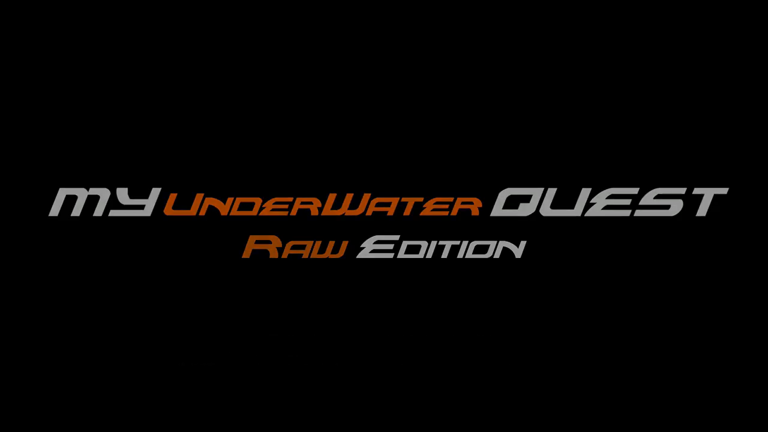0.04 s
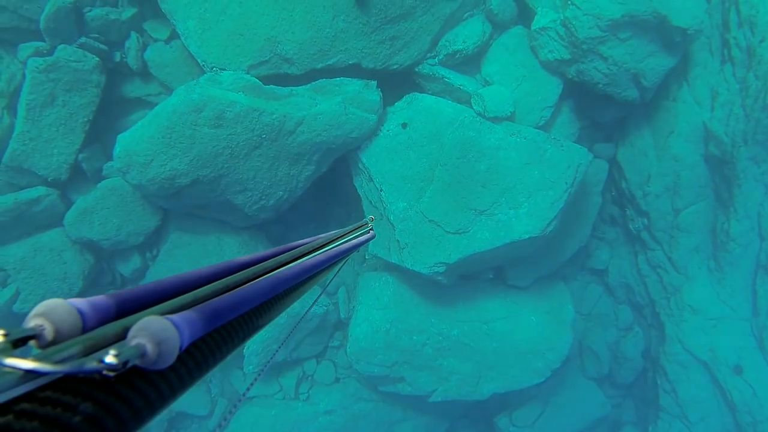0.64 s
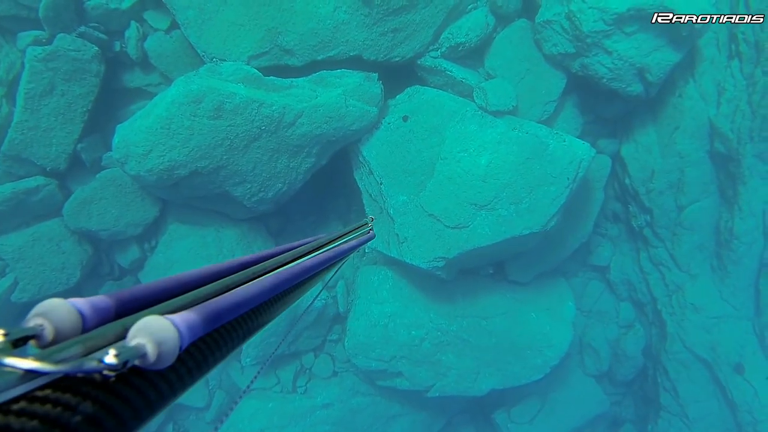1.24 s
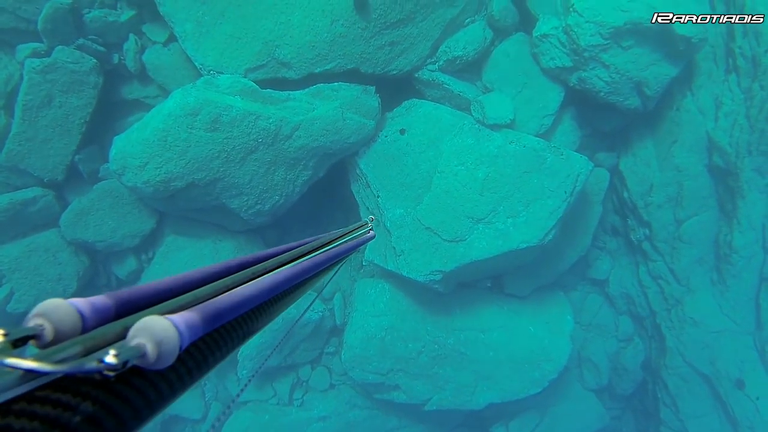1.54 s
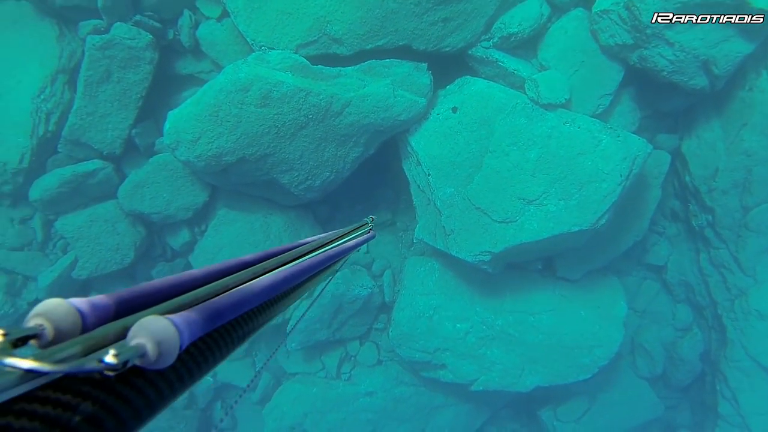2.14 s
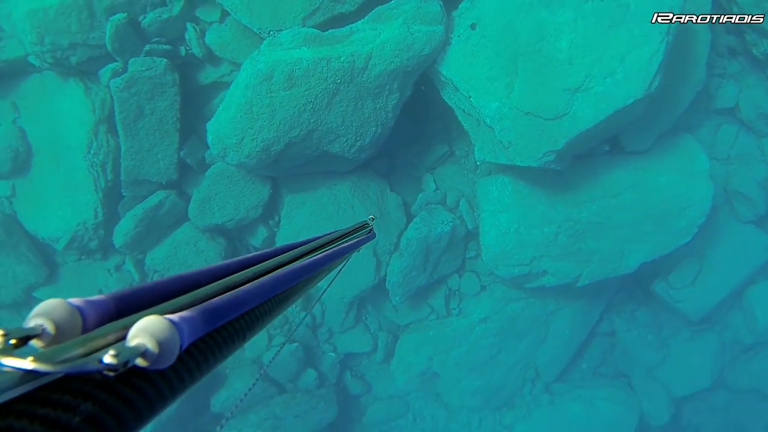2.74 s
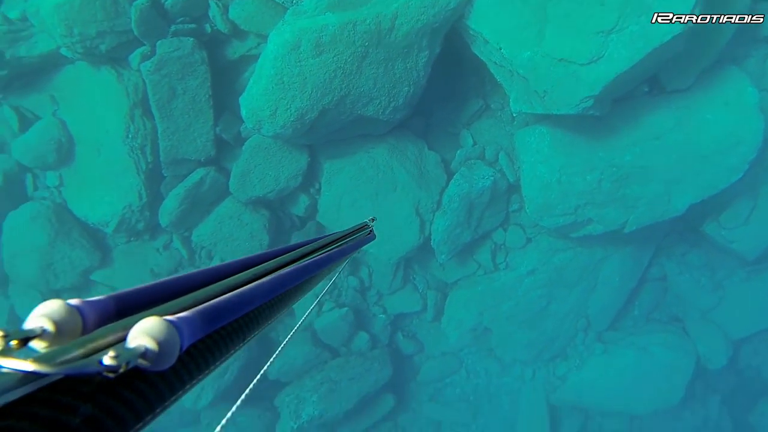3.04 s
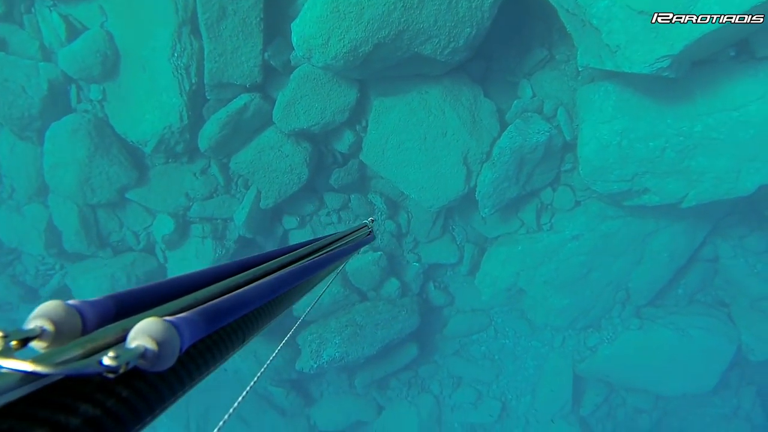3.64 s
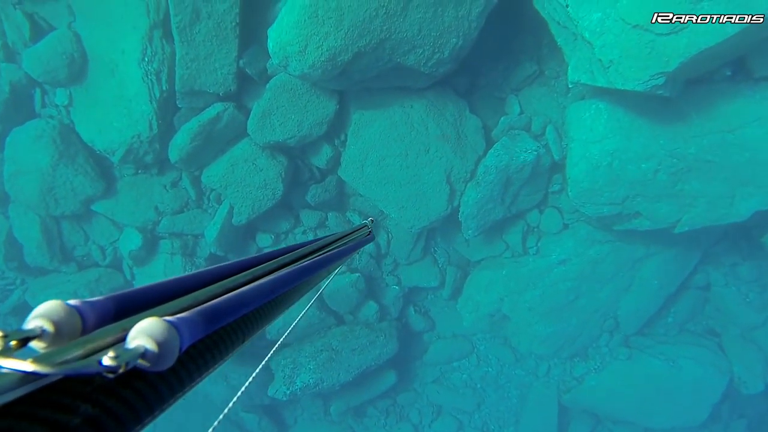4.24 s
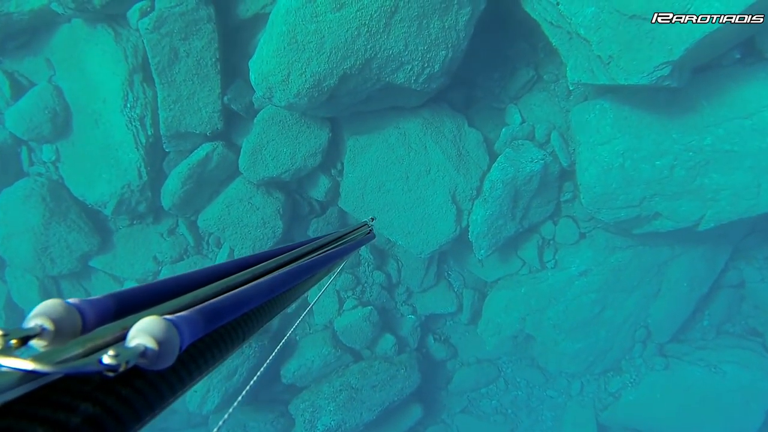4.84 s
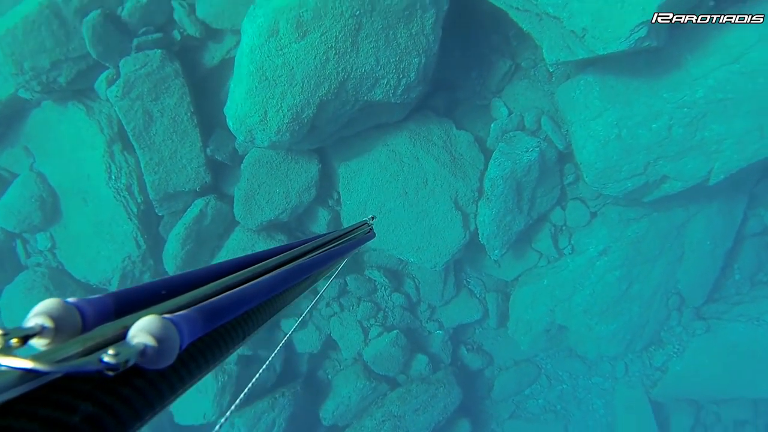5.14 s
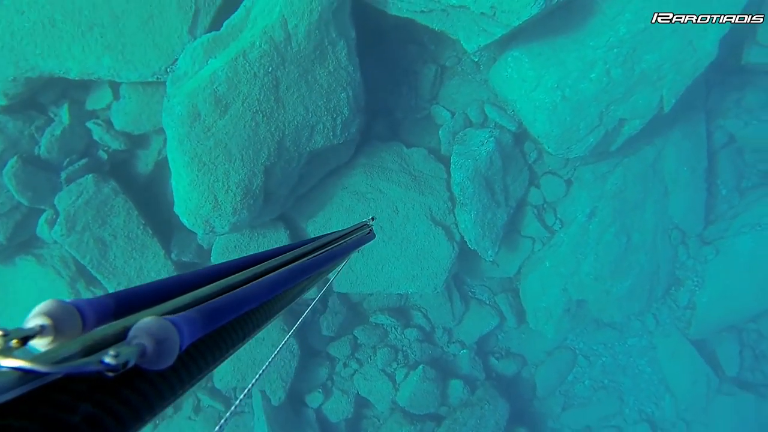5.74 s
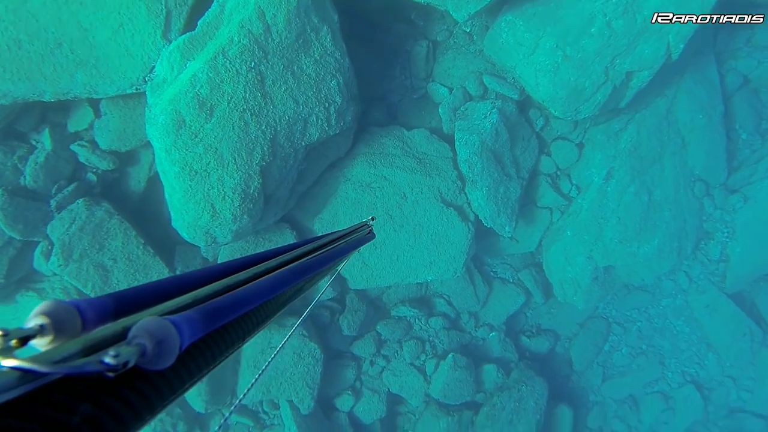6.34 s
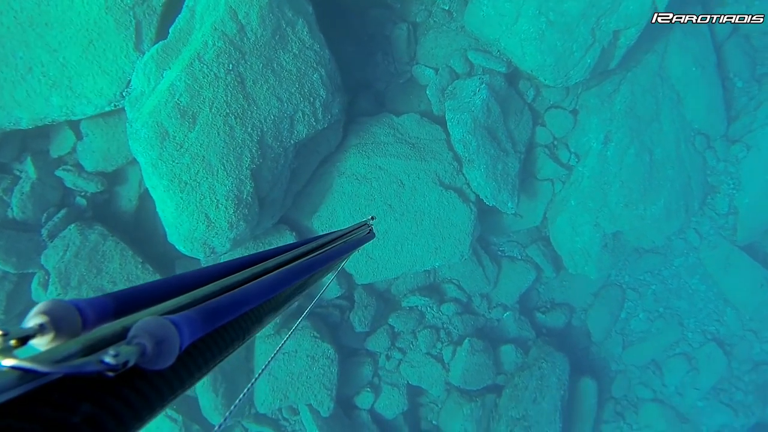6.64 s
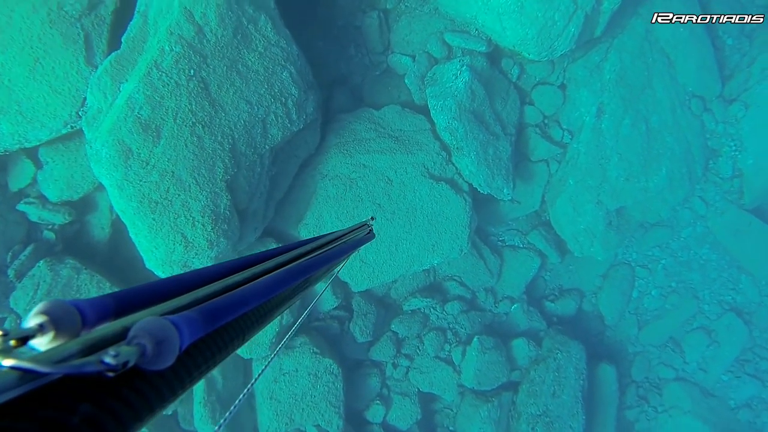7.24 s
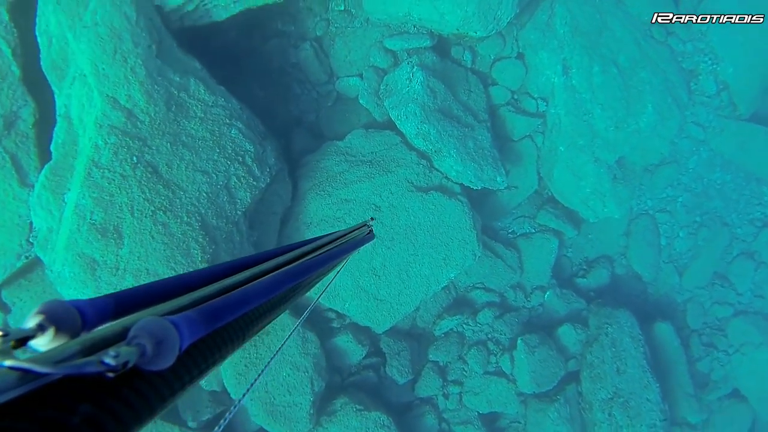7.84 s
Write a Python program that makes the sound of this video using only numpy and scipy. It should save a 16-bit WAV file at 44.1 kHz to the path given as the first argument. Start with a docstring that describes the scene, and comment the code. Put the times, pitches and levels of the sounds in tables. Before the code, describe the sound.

A deep, slowly beating underwater rumble runs for the whole eight seconds, heard from inside a sealed camera housing, with muffled surges of water churning, gurgling and fizzing over it. Shrimp snap irregularly throughout above a faint hiss, sharpest near 3.6, 5.8 and 6.5 seconds. A soft thump and gulp come at about 0.6 seconds, and more gulps at 1.3. From 1.1 to 2.6 seconds a rapid train of ringing ticks, broken at first and then even, sounds with a low gliding hum, like air squeezing through a gap. Air pockets gulp most strongly at 3 seconds and again at 4, as the wash swells. The ticking and hum return from 4.3 to 5 seconds, slowing slightly, with a low thump. Small high blips follow around 5.3 and 5.8 seconds, light scuffs on the housing near 6, and the water keeps washing to the end.

```python
"""Moving water rumbles and washes round a sealed camera housing, gliding on a speargun over a rocky seabed.
The one microphone sits inside: the rocking housing throbs, surges churn and fizz, and close by
pockets of air gulp, blip and thump. Twice a rapid train of ticks with a low hum sets in, like air
squeezing through a narrow gap. Shrimp snap among the near rocks; far off they merge into a hiss."""
import sys
import numpy as np
from scipy import signal
from scipy.fft import rfft, irfft
from scipy.io import wavfile
from scipy.ndimage import uniform_filter1d

SR = 44100
rng = np.random.default_rng(int(sys.argv[2]) if len(sys.argv) > 2 else 0)


def inscribe(sig):
    """Save sig as 16-bit PCM at rate SR to the path in sys.argv[1].

    A 1-D sig is mono; a 2-D sig holds one channel per row.
    Samples are clipped to [-1, 1] before scaling.
    """
    pcm = np.round(np.clip(np.atleast_2d(sig).T, -1, 1) * 32767)
    wavfile.write(sys.argv[1], SR, pcm.astype(np.int16))


N = 347508
TIME = np.arange(N) / SR
FREQS = np.fft.rfftfreq(N, 1 / SR)

# spectrum of water washing round the housing: f/Hz, level/dB
WASH_SPECTRUM = [(120, 0.5), (240, -6.5), (310, 1), (410, 3.5), (490, -3.5), (620, 7), (690, -0.5),
                 (800, -12), (920, -21), (1200, -23), (2000, -77), (8000, -110)]
# the housing's upper resonances, rung by fizz and scuffs: f/Hz, level/dB
FIZZ_SPECTRUM = [(600, 3.5), (1000, -1), (1250, -3.5), (1550, 4), (2000, -10), (2480, 0.5), (2850, -12.5),
                 (3120, -7.5), (4000, -32.5), (4850, -16), (6000, -22), (15000, -64)]


def gain_of(db):
    """Decibels to amplitude."""
    return 10 ** (np.asarray(db) / 20)


def unit_rms(x):
    """Scales to rms 1."""
    return x / np.sqrt(np.mean(x ** 2) + 1e-20)


def value_at(points, hz):
    """Interpolates a table on a log-frequency axis."""
    f, value = np.transpose(points)
    return np.interp(np.log(hz + 1), np.log(f + 1), value)


def curves(rows):
    """Every column of a time table, sample by sample."""
    s, *columns = np.transpose(rows)
    return [np.interp(TIME, s, column) for column in columns]


def add(mix, s, sound):
    """Mixes a sound in at time s."""
    part = mix[max(round(s * SR), 0):][:len(sound)]
    part += sound[:len(part)]


def impulse_response(spectrum, size=4096):
    """Minimum-phase ring with the given spectrum."""
    log_gain = np.log(gain_of(value_at(spectrum, abs(np.fft.fftfreq(size, 1 / SR)))))
    return np.fft.ifft(np.exp(np.conj(signal.hilbert(log_gain)))).real[:size // 2]


def coloured(x, spectrum):
    """Filters a full-length signal by a spectrum, at rms 1."""
    return unit_rms(irfft(rfft(x) * gain_of(value_at(spectrum, FREQS)), N))


def noise():
    """White noise of full length."""
    return rng.standard_normal(N)


def drift(hz):
    """Slow random wander of rms 1."""
    return unit_rms(irfft(rfft(noise()) * np.exp(-(FREQS / hz) ** 2), N))


def wavering(x, share, wander_hz):
    """Lets the pitch of a sound wander by a small share."""
    warped_time = TIME + share * np.cumsum(drift(wander_hz)) / SR
    return np.interp(warped_time % TIME[-1], TIME, x)


def grains(sound, per_s, spread_db, limit):
    """A sound repeated at random moments, mostly small and a few times large."""
    out = np.zeros(N)
    for when, rarity, side in rng.random((1024, 3))[:round(per_s * N / SR)]:
        db = spread_db * min(-np.log(rarity), limit)
        add(out, when * N / SR, np.sign(side - .5) * gain_of(db) * sound)
    return out


def rattle(echo, echo_decay_s, ripple_db, burst_s, size=4096):
    """One snap rattles the housing for a few milliseconds; a thin, crackly echo follows from the rocks."""
    # the housing's response to a snap: f/Hz, level/dB
    spectrum = [(600, -28.5), (1200, -13.5), (1570, 4.5), (2020, -8), (2450, 12), (2850, 3.5), (3150, 3.5),
                (3700, -1.5), (4250, -6), (4850, 3), (5800, -5), (7000, -8.5), (9000, -19.5), (15000, -42)]
    echo_delay_s, echo_rise_s = .009, .001
    t = np.arange(size) / SR
    u, late = t / burst_s, np.maximum(t - echo_delay_s, 0)
    burst = (.6 + 2.6 * u) * np.exp(-u)
    lumps = gain_of(3 * np.interp(t, t[::64], rng.standard_normal(size // 64)))
    tail = echo * lumps * np.minimum(late / echo_rise_s, 1) * np.exp(-late / echo_decay_s)
    direct, scattered = rng.standard_normal((2, size))
    crack = burst * direct + tail * signal.lfilter([1.1, -.55], 1, scattered)
    path_ripple = np.c_[np.geomspace(1000, 15000, 14), ripple_db * rng.standard_normal(14)]
    arriving = signal.fftconvolve(crack, impulse_response(path_ripple, size=512))
    return signal.fftconvolve(arriving, impulse_response(spectrum))[:size]


def far_shrimp(hiss_db=-70, crackle_db=-73, swell_db=1.5, cluster_db=3):
    """Countless distant snaps merge into a swelling hiss; less distant ones crackle softly in clusters."""
    # the merged snaps: f/Hz, level/dB
    hiss_spectrum = [(600, -3.5), (2500, -2), (3600, 1), (4200, -3), (4850, -5), (5900, -12.5), (7100, -9),
                     (9000, -16), (12000, -22), (15000, -28.5)]
    # distance thins the crackle: f/Hz, level/dB
    thinning = [(1500, -15), (2500, -5.5), (4500, -10), (7000, -1.5), (10000, 0.5), (15000, 1)]
    hiss = coloured(noise() * gain_of(swell_db * drift(18)), hiss_spectrum)
    crackle = np.zeros(N)
    for _ in range(32):
        snap = rattle(echo=.3, echo_decay_s=.02, ripple_db=4, burst_s=.0013)
        crackle += grains(snap, per_s=1.6, spread_db=5, limit=2.4)
    clusters = coloured(crackle * gain_of(cluster_db * drift(5.1)), thinning)
    return gain_of(hiss_db) * hiss + gain_of(crackle_db) * clusters


def near_shrimp(crisp_db=-52, smear_s_per_db=.00004):
    """Shrimp snap close by, each snap with its own balance of bands; fainter ones arrive more smeared."""
    # t/s, treble level/dB, then relative to the treble: low knock/dB, middle ring/dB, top sparkle/dB
    snaps = [(0.143, -63, -7, 1, -16), (0.166, -69, 4, 3, -20), (0.23, -63.5, 6, 15.5, -4.5),
             (0.316, -67, -12, -10, -5), (0.3615, -67, -9, 2, -5), (0.393, -71, 2, 9, -14),
             (0.402, -65.5, 7, 12, -18), (0.612, -60.5, -3, -2, -15), (0.821, -76, -8, 1, -12),
             (0.9134, -63.5, 4, 17, -26), (1.212, -56, -13, -4, -13), (1.2466, -66, -14, -7, -16),
             (1.3693, -63, 3, 7, -16), (1.5235, -65, -8, -1, -10), (1.745, -69, -11, -5, -9),
             (1.773, -64.5, -10, 3, -2), (1.801, -56, -3, 9.5, -19), (2.282, -66.5, -13, 6, -5),
             (2.302, -60, -15, 4, -14), (2.499, -69.5, -7, 2, -15), (2.928, -69.5, 0, 13.5, -12),
             (3.0076, -72.0, 5, 9, -5), (3.0778, -74, 10, 13.5, -22), (3.131, -74, -1, 14, -22),
             (3.1535, -69.5, -8, 16, -12), (3.327, -63.5, -6, -10, -18), (3.3583, -70, 0, -4, -24),
             (3.4676, -69, 2, 8, -14), (3.5571, -47.5, 5.5, 9, -18), (3.677, -74.5, 20, 18, -11),
             (3.7593, -64, 0, 9.5, -10), (3.8704, -59.5, -4, 3.5, -14), (3.913, -74, 1, -2, -6),
             (4.022, -71, 11, 7, -17), (4.0785, -55, 3.5, -6, -11), (4.2874, -72, -9, 6, -6),
             (4.3886, -69.5, -14, -10, -17), (4.6518, -64, -8, -4, -14), (4.754, -65, -6, 1, -13),
             (4.774, -58, 2, 4, -20), (4.7912, -64, -8, -3, -16), (4.9681, -68, -6, -1, -15.5),
             (4.977, -64.5, -9, -7, -18), (5.1558, -62, 7, -1, -17), (5.1921, -66.5, -5, -1, -8),
             (5.2608, -56.5, 15, 13.5, -10), (5.506, -62, -8, -14, -15), (5.6456, -72, 0, 11, -22),
             (5.814, -49.5, -2.5, 5, -17), (5.9883, -68, -2, 7, -9), (6.0982, -64.5, 4, 4, -11),
             (6.424, -62.5, 0, 7.5, -17), (6.5215, -47.5, -8, -0.5, -20), (6.609, -68, -4, -4, -7),
             (6.638, -71.5, 15, 9, -21), (6.6495, -67.5, -7, 10, -11), (6.6688, -64, -7, -5, -11),
             (6.6933, -61.5, -13, -7, -8), (6.865, -67.5, 12, 11.5, -3), (6.9093, -68, -7, 5, -28),
             (6.944, -54, -5, 10, -19), (7.053, -71, -4, -7, -9), (7.0957, -70, -2, -3, -22),
             (7.241, -71, -3, 11, -21), (7.296, -62, -10, 10, -24), (7.5186, -67.5, -9, 7.5, -9),
             (7.5477, -70, -10, 2, -20)]
    # edges of the knock, ring, treble and sparkle bands: f/Hz
    edges = (1200, 2000, 4100, 8300, 16000)
    lead, head = 64, 352  # samples: padding, and the first 8 ms that set a band's level
    out = np.zeros(N)
    for s, db, knock_db, ring_db, sparkle_db in snaps:
        burst_s = .001 + smear_s_per_db * max(crisp_db - db, 0)
        crack = np.pad(rattle(echo=.21, echo_decay_s=.015, ripple_db=7.5, burst_s=burst_s), lead)
        hz = np.fft.rfftfreq(len(crack), 1 / SR)
        lowpasses = [1 / (1 + (hz / edge) ** 16) for edge in edges]
        bands = irfft(rfft(crack) * np.diff(lowpasses, axis=0))
        balance = gain_of([knock_db, ring_db, 0, sparkle_db]) / bands[:, lead:lead + head].std(axis=1)
        add(out, s - lead / SR, gain_of(db) * balance @ bands)
    return out


def scuffs():
    """Short scuffs on the housing rustle in its resonances."""
    # peak t/s, level/dB, half-width/s
    touches = [(0.483, -55, 0.0035), (.577, -46, 0.0021), (0.587, -45.5, .002), (1.312, -44, 0.0026),
               (1.378, -51, 0.0034), (1.47, -48, 0.0026), (3.377, -48.5, 0.028), (3.685, -41.5, 0.0034),
               (4.027, -48, 0.012), (5.278, -50.5, 0.026), (6.07, -51, 0.019), (6.151, -56.5, .025)]
    envelope = sum(gain_of(db) * np.exp(-((TIME - s) / width) ** 2) for s, db, width in touches)
    return envelope * coloured(noise(), FIZZ_SPECTRUM)


def hum(fifth_db=-15):
    """A low tone glides at about twice the ticking rate, with a weak partial a fifth above."""
    # one list for each glide: t/s, f/Hz, level/dB
    glides = [
        [(1.1, 49, -40), (1.3, 57, -33.5), (1.5, 63, -42), (1.63, 66, -45)],
        [(1.66, 84, -53), (1.8, 81.5, -34.5), (2.0, 80.5, -34.5), (2.2, 80, -38), (2.4, 79, -45),
         (2.55, 76, -55)],
        [(4.35, 86, -64), (4.47, 91, -47.5), (4.6, 88, -36), (4.75, 81, -64), (4.95, 76, -43)],
    ]
    out = np.zeros(N)
    for rows in glides:
        hz, db = curves(rows)
        phase = 2 * np.pi * np.cumsum(hz) / SR
        gate = uniform_filter1d(1. * (TIME > rows[0][0]) * (TIME < rows[-1][0]), size=2000)
        tone = np.sin(phase) + gain_of(fifth_db) * np.sin(1.5 * phase)
        out += np.sqrt(2) * gate * gain_of(db) * tone
    return out


def tick_times():
    """Each run ticks evenly, or slows as the gap grows from tick to tick."""
    # runs of ticks: first t/s, last t/s, first gap/s, growth of the gap per tick/s
    runs = [(1.141, 1.245, .035, 0), (1.45, 1.515, .065, 0), (1.543, 1.543, .028, 0),
            (1.611, 1.639, .028, 0), (1.707, 2.28, .0249, 0), (2.3065, 2.481, .025, 0),
            (2.558, 2.558, .025, 0), (4.29, 4.342, .026, 0), (4.3812, 4.978, .0211, .000233)]
    times = []
    for s, last, gap, growth in runs:
        while s < last + gap / 2:
            times.append(s)
            s, gap = s + gap, gap + growth
    return np.array(times)


def ticks(trim_db=.8, detune=.007, smear=.55, smear_s=.002, echo=.32, echo_s=.0048, size=2048):
    """Squeezed air ticks: a bright onset sinks into a short ring; faster, harder ticks are brighter."""
    # the ring of a tick: f/Hz, level/dB
    spectrum = [(700, -62.5), (1000, 0), (1170, -6.5), (1300, 12.5), (1430, 18.5), (1540, 15), (1700, -4),
                (2080, 1), (2250, -7.5), (2800, 3), (3500, -2), (4050, -30.5), (4800, -33.5), (5400, -38.5),
                (6000, -69.5), (8000, -88)]
    # how late each part of the ring builds up: f/Hz, delay/s
    delays = [(1000, 0.00166), (1300, 0.003), (1480, 0.0049), (1750, 0.0014), (2200, 0.0026),
              (3300, 0.00031), (4700, 0.00042)]
    # strength through the two spells of ticking: t/s, relative peak level/dB
    strength = [(1.14, -45), (1.25, -46.5), (1.45, -38.5), (1.515, -43), (1.543, -34), (1.61, -43),
                (1.64, -36), (1.82, -35.5), (1.89, -44.5), (2.0, -39.5), (2.12, -37), (2.25, -40),
                (2.28, -50), (2.332, -36.5), (2.357, -48), (2.382, -47), (2.407, -36), (2.457, -51),
                (2.481, -33), (2.56, -38.5), (4.29, -36.5), (4.375, -45.5), (4.402, -34), (4.5, -34),
                (4.6, -37.5), (4.72, -40), (4.82, -42.5), (4.85, -36), (4.875, -44), (4.9, -41.5),
                (4.98, -41)]
    hz, t = np.fft.rfftfreq(size, 1 / SR), np.arange(size) / SR
    lead_s = 128 / SR
    treble = value_at([(3700, .037), (4500, .6)], hz)
    phase = -2 * np.pi * np.cumsum(value_at(delays, hz) + lead_s) * SR / size
    bright_echo = echo * (hz > 2000) * np.exp(-2j * np.pi * hz * echo_s)
    times = tick_times()
    levels = np.interp(times, *np.transpose(strength)) + rng.standard_normal(len(times))  # 1 dB uneven
    rate_hz = np.maximum(1 / np.gradient(times), 38)
    brightness = 9 + 2.2 * (rate_hz - np.median(rate_hz)) + 2.4 * (levels - np.median(levels))
    out = np.zeros(N)
    for s, db, bright in zip(times, levels, brightness):
        colour_db = value_at(spectrum, hz * (1 + detune * rng.standard_normal())) + treble * bright
        reflections = rng.standard_normal(size) * np.exp(-t / smear_s)
        paths = 1 + smear * rfft(reflections / np.linalg.norm(reflections)) + bright_echo
        tick = irfft(gain_of(colour_db) * np.exp(1j * phase) * paths)
        add(out, s - lead_s, gain_of(db + trim_db) * tick / abs(tick).max())
    return out


def air_pockets(rows, trim_db, rise, glide, top_hz):
    """A pocket of air swells quickly into a few cycles and dies away, its pitch creeping upward."""
    out = np.zeros(N)
    for s, db, hz, length in rows:
        length = max(length, .35 / hz)
        t = np.arange(-2 * length, 6 * length, 1 / SR)
        u = t / length
        swell = np.where(u < 0, np.exp(-(u / rise) ** 2), 1 / np.cosh(2.05 * u))
        tone = np.cos(2 * np.pi * hz * t * (1 + glide * np.tanh(u)))
        add(out, s + t[0], gain_of(db + trim_db) * swell * tone)
    # water cushions the motion, so nothing rings far above the pitch
    cushion = 1 / np.sqrt(1 + (FREQS / top_hz) ** 24)
    return irfft(rfft(out) * cushion, N)


def blips():
    """Small pockets of air ring high and briefly."""
    # peak t/s, relative level/dB, f/Hz, length/s
    pockets = [(2.066, -38, 1430, 0.0076), (2.551, -41.5, 2390, 0.0035), (2.711, -40.5, 1435, 0.0074),
               (2.962, -44.5, 2510, 0.0077), (3.28, -49, 1650, 0.0067), (3.385, -47.5, 1580, 0.0072),
               (3.46, -44.5, 1430, 0.0065), (3.539, -45, 2400, 0.0035), (3.6185, -53, 2440, 0.0031),
               (3.6375, -47, 2370, 0.0064), (3.811, -43.5, 878, 0.017), (5.172, -55, 2470, 0.0056),
               (5.207, -46, 1430, 0.01), (5.279, -31, 1470, 0.0067), (5.301, -33, 1436, 0.0074),
               (5.7635, -35.5, 1450, 0.0053), (5.870, -38.5, 1490, 0.0051)]
    return air_pockets(pockets, trim_db=2, rise=.25, glide=.0056, top_hz=3000)


def thumps():
    """Soft, low thumps sound on the housing."""
    # peak t/s, relative level/dB, f/Hz, length/s
    pulses = [(.36, -28, 113, 0.017), (.452, -33.5, 153, 0.011), (.578, -16, 110, .022),
              (1.290, -25.5, 125, 0.014), (1.305, -33.5, 185, 0.035), (3.05, -32, 122, .03),
              (3.439, -22.5, 162, 0.025), (3.84, -36.5, 245, 0.033), (4.029, -15, 140, 0.0034),
              (4.45, -18, 54.3, 0.066), (6.62, -31, 279, 0.011)]
    return air_pockets(pulses, trim_db=-2, rise=.42, glide=.0091, top_hz=310)


def gulps(gap_s=.0074, jitter=.3, step_db=-5, pitch_step=1.017):
    """Trapped air gulps as one pocket or a quick, uneven chain, each weaker and higher than the last."""
    # first peak t/s, relative level/dB, f/Hz, pocket length/s, number of pockets
    chains = [(0.5715, -17, 587, 0.0013, 1), (0.907, -20, 534, 0.0038, 1), (1.281, -18, 517, 0.0042, 1),
              (1.286, -21.5, 530, 0.0037, 1), (1.3015, -19.5, 520, 0.0039, 1),
              (1.3105, -25, 520, 0.0046, 1), (1.333, -22, 543, 0.0029, 1), (1.47, -27.5, 610, 0.0024, 1),
              (1.648, -20.5, 460, 0.0022, 1), (2.862, -25.5, 355, 0.0077, 1), (3.016, -24, 506, 0.0021, 1),
              (3.0234, -22, 503, 0.0024, 1), (3.0313, -20, 530, 0.0064, 1), (3.039, -8.5, 530, 0.0035, 1),
              (3.055, -10.5, 595, .0055, 2), (3.119, -31.5, 550, 0.008, 1), (3.808, -22, 392, 0.0057, 1),
              (3.967, -36, 480, 0.0053, 1), (4.005, -36, 560, 0.0027, 2), (4.019, -11.5, 470, 0.0015, 1),
              (4.026, -20.5, 500, .003, 1), (4.049, -15.5, 394, .0036, 1), (4.061, -26, 600, .004, 1),
              (4.4264, -23.5, 583, 0.024, 1), (4.447, -19, 517, 0.0023, 1), (4.593, -23.5, 590, 0.009, 1),
              (4.759, -19.5, 740, 0.0032, 1), (5.12, -26, 460, 0.0088, 1), (5.291, -30, 636, 0.0038, 1),
              (5.349, -31.5, 586, 0.01, 1), (5.606, -32, 370, 0.0093, 1), (5.77, -29, 576, 0.0062, 1),
              (5.896, -32, 579, 0.019, 1), (6.0066, -24, 387, 0.0095, 1), (6.075, -29, 296, 0.02, 1),
              (6.426, -33, 621, 0.038, 1), (6.615, -24, 406, 0.0036, 1), (7.612, -24.5, 386, 0.0081, 1)]
    pockets = []
    for s, db, hz, length, count in chains:
        slips = jitter * rng.uniform(-1.026, 1, size=8)
        for k in range(round(count)):
            delay = (k + slips[k] * (k > 0)) * gap_s
            pockets.append((s + delay, db + k * step_db, hz * pitch_step ** k, length))
    return air_pockets(pockets, trim_db=-5.5, rise=.37, glide=.041, top_hz=760)


def slosh(gulping, level_db=-7, decay_s=.014):
    """After each gulp the stirred water goes on washing for a moment."""
    fade = np.exp(-2 * np.arange(4096) / SR / decay_s)
    power = signal.oaconvolve(gulping ** 2, fade / fade.sum())[:N]
    return gain_of(level_db) * np.sqrt(abs(power)) * coloured(noise(), WASH_SPECTRUM)


def bubbles(low_hz, high_hz, per_s, cycles, sizes):
    """Each size of bubble rings for a few cycles at its own pitch, per_s times a second."""
    t, out = np.arange(3072) / SR, np.zeros(N)
    for hz in np.geomspace(low_hz, high_hz, sizes):
        u = hz * t / cycles
        bubble = unit_rms(u * np.exp(-u) * np.sin(2 * np.pi * hz * t))
        out += grains(bubble, per_s, spread_db=3.5, limit=2.5)
    return out


def swish():
    """Smooth flow excites the housing's hollow resonances, whose pitch wanders a little."""
    # resonances: f/Hz, width/Hz, level/dB
    modes = [(407, 190, -0.5), (587, 89, 3), (688, 100, -3), (1460, 140, -29.5), (1750, 180, -23.5),
             (2320, 71, -41.5), (3100, 150, -28)]
    body = sum(gain_of(db) / (1 + ((FREQS - hz) / (.69 * width)) ** 2) ** 2 for hz, width, db in modes)
    hollow = unit_rms(irfft(rfft(noise()) * body, N))
    return wavering(hollow, share=.01175, wander_hz=4)


def flow(rise_s=.032, ebb_s=.11, eddies_db=1.8):
    """Surges swell and ebb, eddies stir them: churn, wash and fizz in dB, and the wash's smooth share."""
    # start t/s, hold/s, relative levels of churn/dB, wash/dB, fizz/dB, share of smooth flow (0-1)
    surges = [(0.0, 0.35, -52, -57.5, -72, 0.95), (0.56, 0.31, -50.5, -41.5, -70, 0.97),
              (1.17, 0.43, -67, -54, -65, 0), (1.716, 0.98, -46.5, -47.5, -61.5, 0.01),
              (2.006, 0.2, -57, -46, -66, 0.25), (2.799, 0.39, -47, -52.5, -58, 0.13),
              (3.305, 0.61, -42, -43, -52.5, 0.06), (3.85, 0.1, -41, -35.5, -54, 0.85),
              (4.123, 0.33, -46.5, -42.5, -56.5, 0.03), (4.392, 0.23, -41.5, -44, -55, 0.02),
              (4.645, 0.22, -49, -41, -54, 0.03), (4.942, 0.096, -46.5, -49, -54.5, 0.2),
              (5.195, 0.29, -72, -55.5, -56.5, 0.9), (5.587, 0.2, -50.5, -43.5, -58, 0.05),
              (5.835, 0.29, -52, -47, -51.5, 0.06), (6.096, 0.25, -46, -44, -57.5, 0.28),
              (6.532, 0.5, -55.5, -48.5, -60.5, 0.04), (6.7, 0.24, -46, -43.5, -68, 0.97),
              (7.08, 0.32, -45, -61, -65.5, 0.45), (7.576, 0.24, -41.5, -52.5, -64, 0.02)]
    power = gain_of([[-54], [-53], [-61.5]]) ** 2 * np.ones(N)  # churn, wash and fizz of calm water
    smooth_power = np.zeros(N)
    for start, hold, churn_db, wash_db, fizz_db, share in surges:
        swell = np.clip((TIME - start) / rise_s, 0, 1)
        ebb = np.exp(-np.maximum(TIME - start - hold, 0) / ebb_s)
        surge_power = (gain_of([[churn_db], [wash_db], [fizz_db]]) * swell * ebb) ** 2
        power += surge_power
        smooth_power += share * surge_power[1]
    levels = 10 * np.log10(power) + eddies_db * drift(7)
    return *levels, np.clip(smooth_power / power[1], 0, 1)


def water(flutter_db=3, lumps_db=2):
    """Eddies churn, air gurgles in the wash, and tiny bubbles fizz and ping in the housing's resonances."""
    # low churn of the eddies: f/Hz, level/dB
    churn_spectrum = [(25, -21), (42, -2), (55, 0.5), (80, -5.5), (115, -11), (160, -16), (240, -23.5),
                      (400, -27.5), (900, -89), (4000, -130)]
    churn_db, wash_db, fizz_db, smooth = flow()
    churn = coloured(noise(), churn_spectrum) * gain_of(churn_db + 7)
    rush = coloured(noise() * gain_of(flutter_db * drift(32)), WASH_SPECTRUM)
    gurgle = coloured(bubbles(241.7, 959.6, per_s=2.8, cycles=5.8, sizes=22), WASH_SPECTRUM)
    rough = gain_of(-6.5) * rush + gain_of(-6) * gurgle
    wash = np.sqrt(1 - smooth) * rough + np.sqrt(smooth) * gain_of(2) * swish()
    fizz = coloured(noise() * gain_of(lumps_db * drift(37)), FIZZ_SPECTRUM)
    pings = coloured(bubbles(886, 3218, per_s=3.6, cycles=6.8, sizes=30), FIZZ_SPECTRUM)
    froth = wavering(gain_of(-2.86) * fizz + gain_of(-8) * pings, share=.02, wander_hz=2)
    return churn + wash * gain_of(wash_db) + froth * gain_of(fizz_db)


def sway(steadiness=.75):
    """The housing rocks in the water: a deep, nearly tonal throb that beats slowly."""
    # the throb: f/Hz, level/dB
    spectrum = [(8, -11), (16, -10.5), (22, 8.5), (26, 2), (31, -10), (38, -21.5), (50, -40.5), (70, -43.5),
                (120, -93), (1000, -160)]
    # strength of the rocking: t/s, level/dB
    rocking = [(0.0, -26.5), (0.09, -16.5), (0.15, -30.5), (0.22, -15), (0.88, -24.5), (0.94, -34),
               (1.31, -21), (1.42, -30), (1.93, -25), (2.08, -17), (2.13, -39), (2.19, -23.5),
               (2.43, -20.5), (2.5, -34.5), (2.57, -16), (2.81, -22.5), (2.87, -15), (3.05, -23.5),
               (3.11, -15.5), (3.25, -27.5), (3.31, -15.5), (3.91, -21), (3.95, -27), (4.02, -14.5),
               (4.13, -17), (4.24, -27), (4.28, -18.5), (4.5, -24.5), (4.54, -17.5), (4.67, -28.5),
               (4.76, -15.5), (4.96, -19.5), (5.02, -26.5), (5.16, -15), (5.4, -34.5), (5.44, -27),
               (5.53, -29.5), (5.79, -22.5), (5.97, -34), (6.01, -23), (6.52, -23.5), (6.58, -33),
               (6.67, -22), (6.85, -30.5), (7.02, -17.5), (7.09, -40.5), (7.22, -20), (7.34, -31),
               (7.44, -31.5), (7.5, -30), (7.64, -17), (7.77, -31), (7.84, -20.5), (7.88, -16)]
    throb = coloured(noise(), spectrum)
    envelope = np.sqrt(uniform_filter1d(abs(signal.hilbert(throb)) ** 2, size=3000) + .033)
    return unit_rms(throb / envelope ** steadiness) * gain_of(curves(rocking)[0])


def scene():
    """Near and far, everything reaches the one microphone through the housing."""
    gulping = gulps()
    close_by = gulping + slosh(gulping) + blips() + thumps() + scuffs() + ticks() + hum()
    return (sway() + water() + far_shrimp() + close_by + near_shrimp())[None]


def record(dry, fade_s=.015, top_hz=15700):
    """The camera adds its faint whine and limits the band; the sound fades quickly in and out."""
    # whine of the camera's electronics: f/Hz, level/dB
    tones = [(7900, -99), (7950, -91.5), (12300, -107)]
    whine = sum(np.sqrt(2) * gain_of(db) * np.sin(2 * np.pi * hz * TIME) for hz, db in tones)
    from_edge_s = np.minimum(TIME, TIME[::-1])
    fade = np.sin(np.pi / 2 * np.minimum(from_edge_s / fade_s, 1)) ** 2
    lowpass = signal.firwin(511, top_hz, window=("kaiser", 9), fs=SR)
    return signal.oaconvolve(fade * (dry + whine), lowpass[None], "same")


dry = scene()
out = record(dry)
inscribe(out)
```